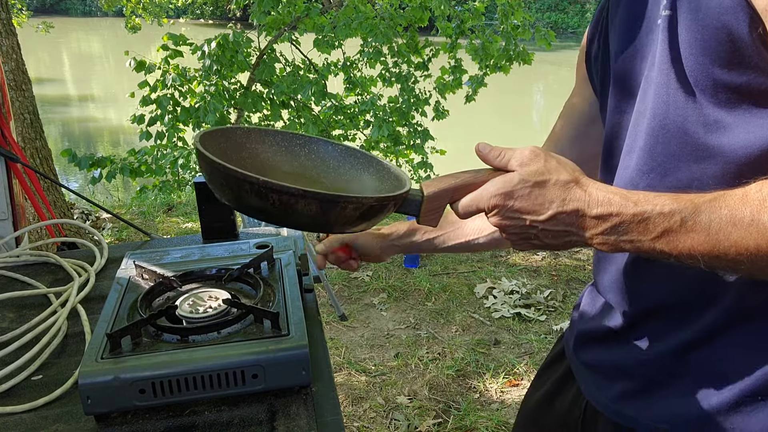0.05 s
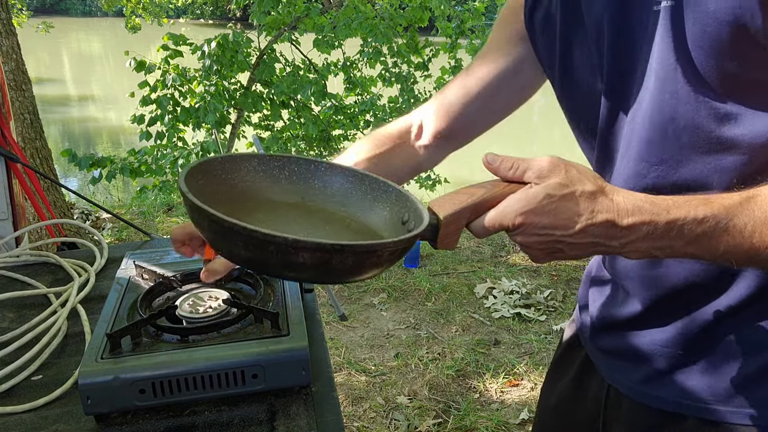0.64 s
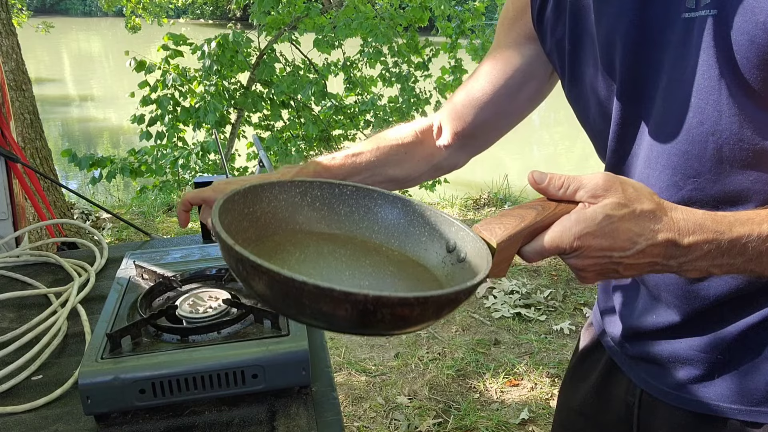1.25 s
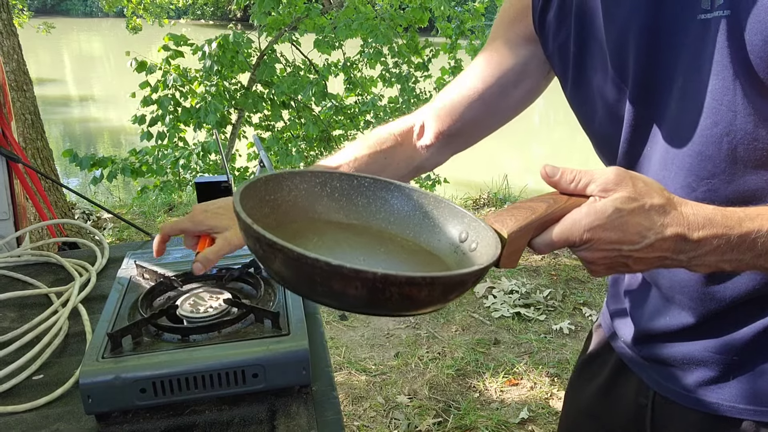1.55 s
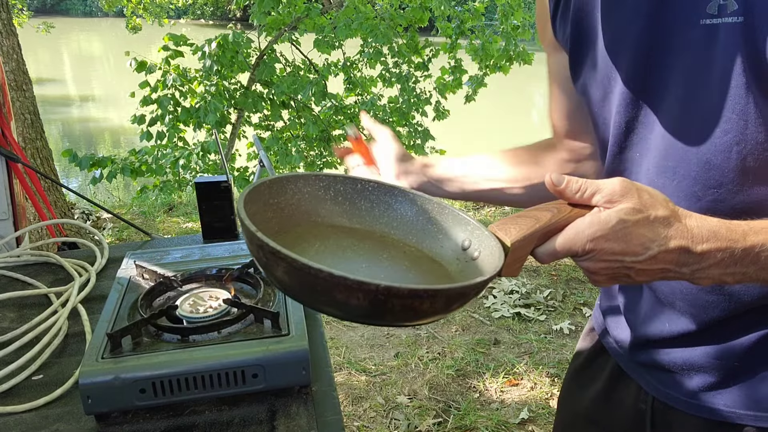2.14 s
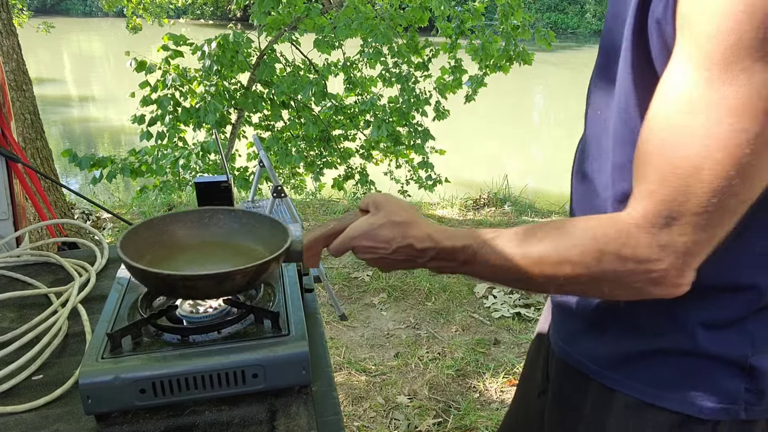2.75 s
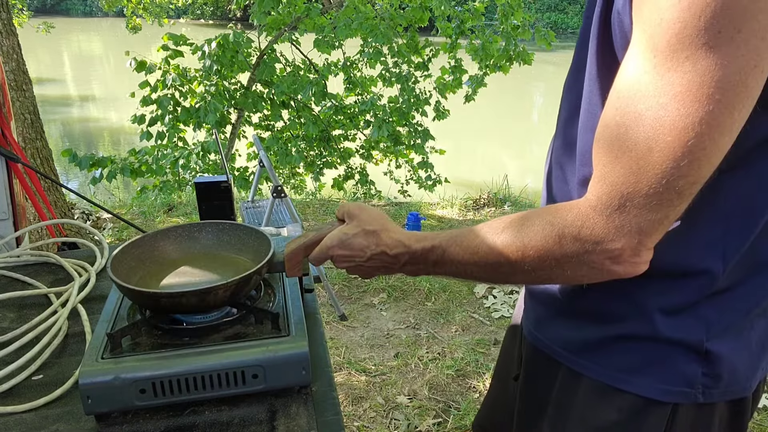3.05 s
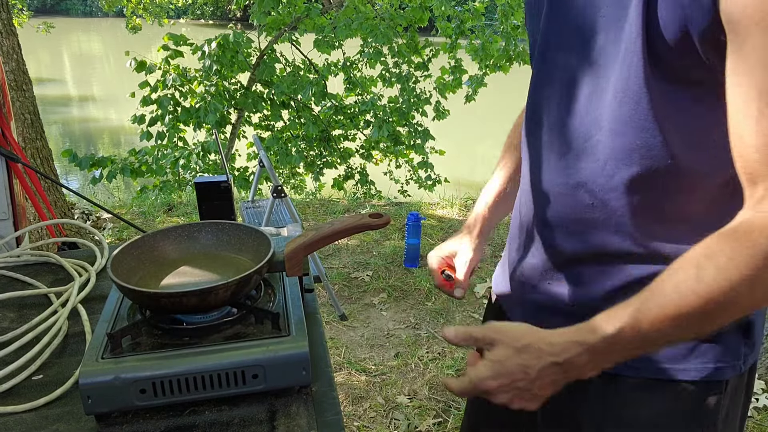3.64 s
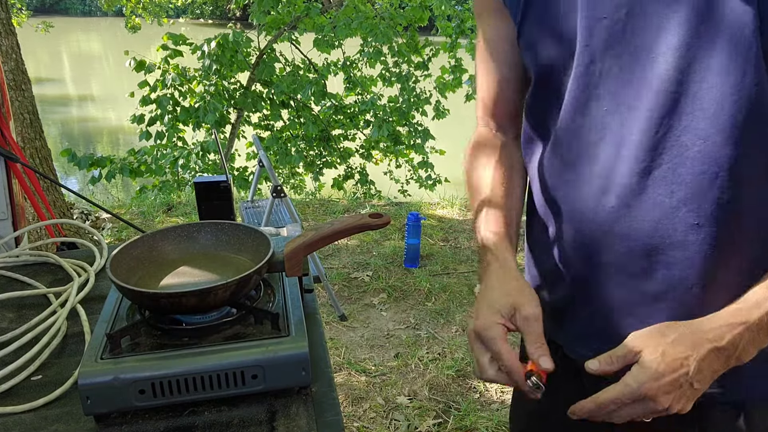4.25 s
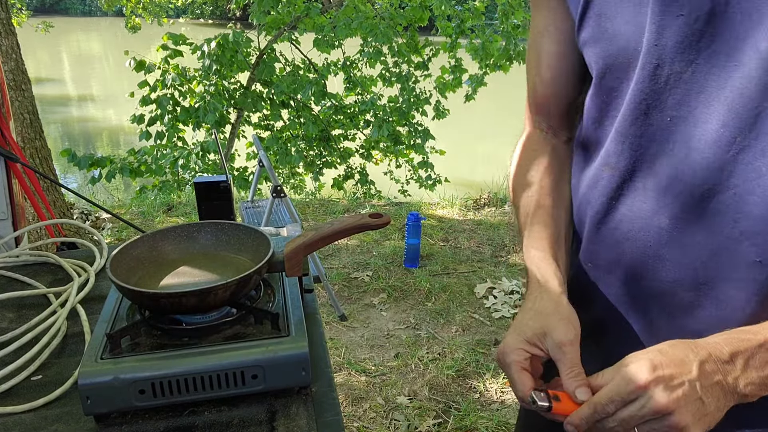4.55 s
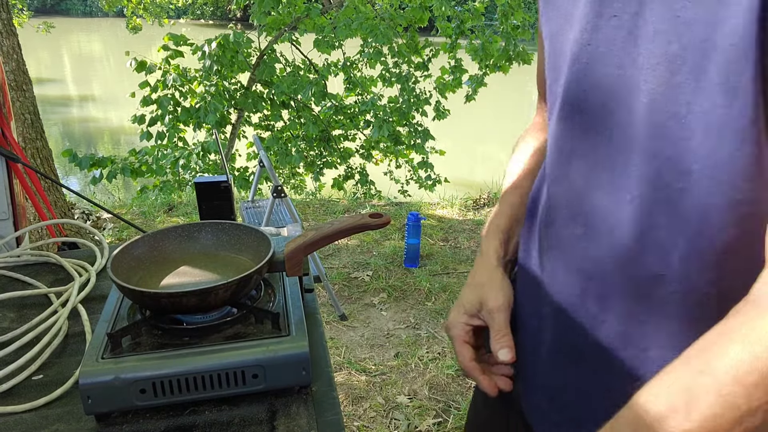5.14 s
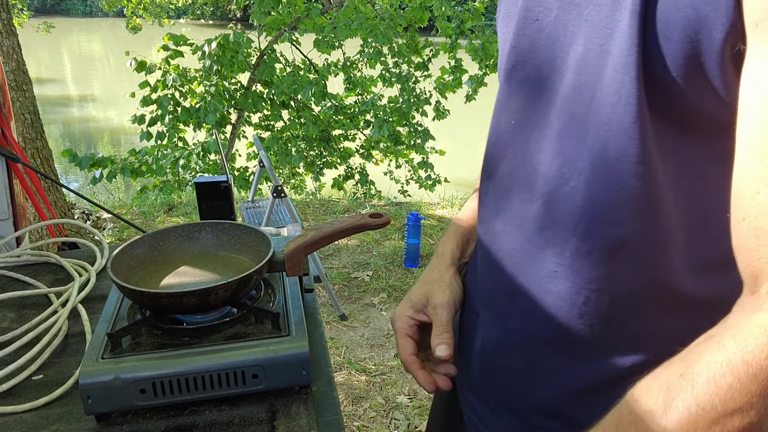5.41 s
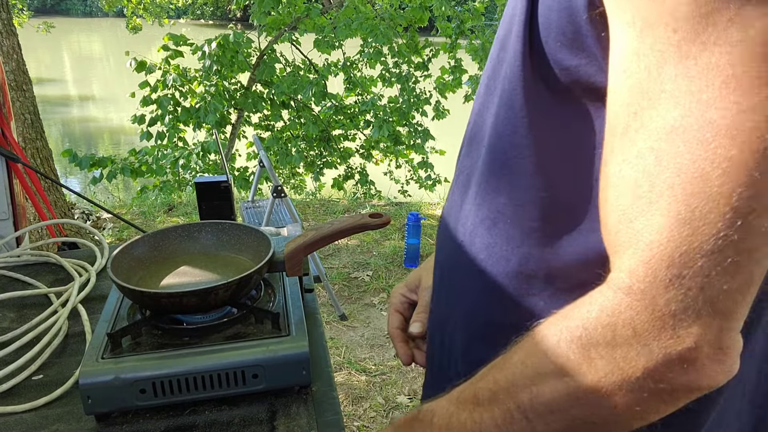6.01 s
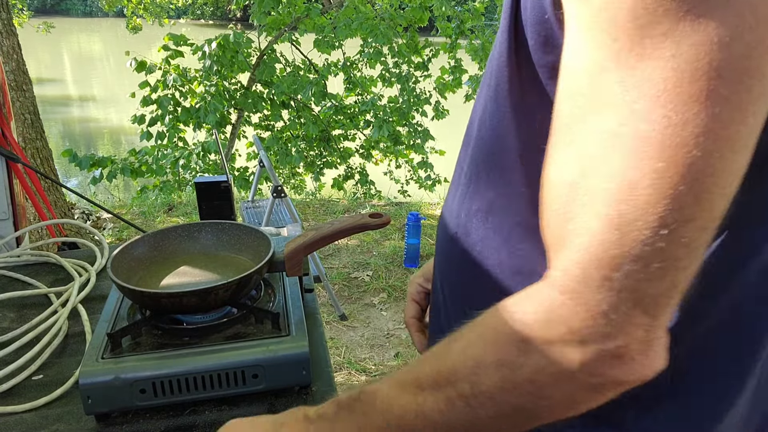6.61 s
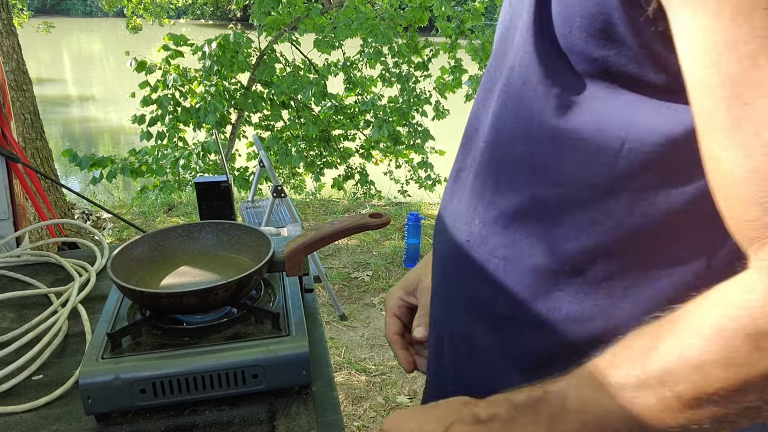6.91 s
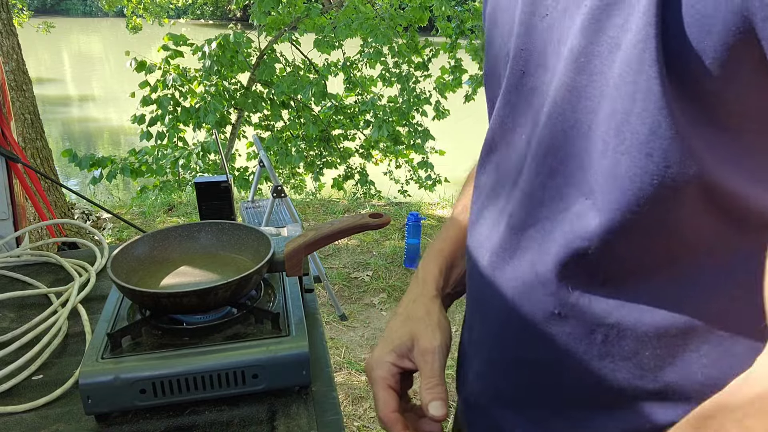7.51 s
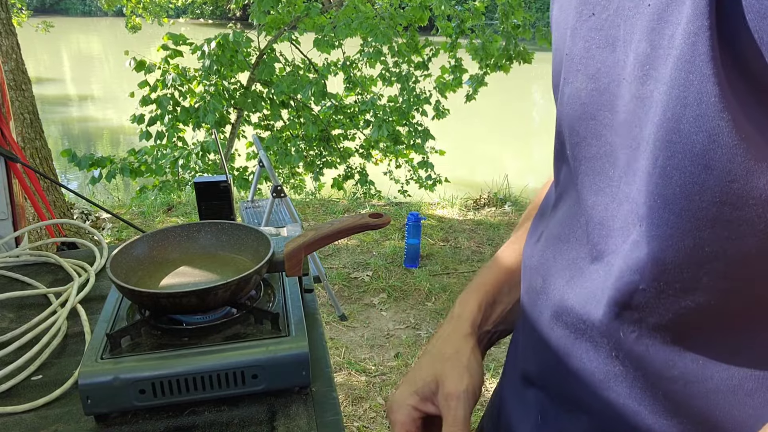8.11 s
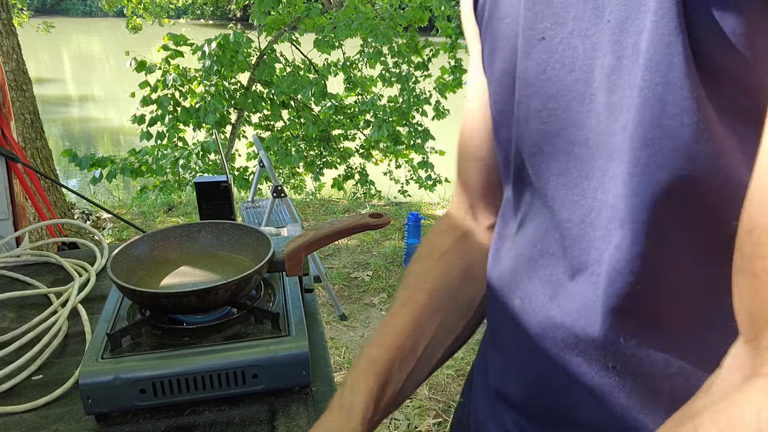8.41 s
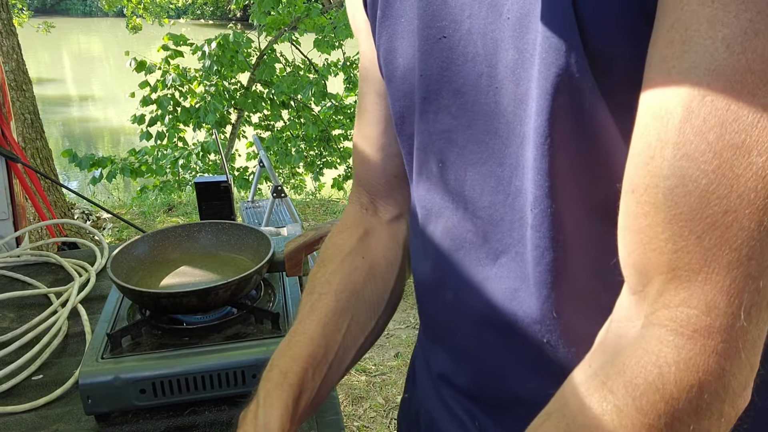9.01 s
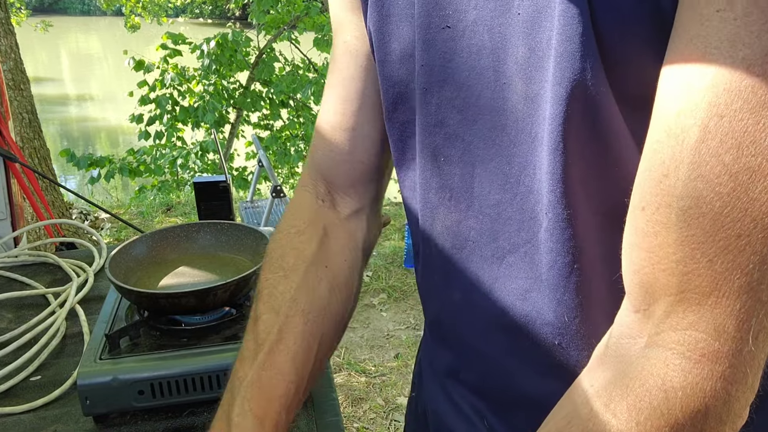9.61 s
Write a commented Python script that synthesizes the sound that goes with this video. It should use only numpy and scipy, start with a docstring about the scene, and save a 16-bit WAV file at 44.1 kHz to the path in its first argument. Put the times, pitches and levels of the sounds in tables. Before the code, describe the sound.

Close by, a portable gas stove flares with a thump that rings its steel case, and a flint lighter rasps twice. A frying pan clanks onto the grate. Light objects clack and slide on a table, a metal one knocks sharply, and a wrapper crinkles faintly. Behind it all, insects buzz in the trees over soft open air and a far low drone.

```python
"""Camp stove among insects

Close up, gas flares and rings the stove's steel case; a second later a flint lighter rasps twice. A
frying pan clanks onto the grate. Things clack, slide and knock on the table, then a wrapper crinkles as
its creases let go. Each hit is a burst of decaying noise, with ringing modes for case, pan and metal.
Behind, two insect choruses of band-shaped noise throb in the trees over open air and a far low drone."""
import sys
import numpy as np
from scipy import signal
from scipy.fft import rfft, irfft
from scipy.io import wavfile
from scipy.ndimage import uniform_filter1d

SR = 44100
rng = np.random.default_rng(int(sys.argv[2]) if len(sys.argv) > 2 else 0)


def to_wav(s):
    """Save 16-bit WAV."""
    ch = np.atleast_2d(s).T  # columns
    pcm = np.round(np.clip(ch, -1, 1) * 32767)  # PCM
    wavfile.write(sys.argv[1], SR, pcm.astype(np.int16))


N = 430416

# gas flares and lighter strokes: t/s, level/dB, swell/s, decay multiplier, low-pass f/Hz
GAS_FLARES = [(.7995, -35, 0.0019, 1.6, 15000), (.833, -31, 0.0059, 0.38, 15000),
              (.846, -24.5, 0.0058, 0.92, 15200)]
FLINT_STROKES = [(1.774, -42, 0.0021, 1.1, 12200), (1.837, -42, 0.0013, 0.56, 15000)]
# their tone: f/Hz, level/dB
FLARE_EQ = [(100, 4.5), (280, 5), (500, -2), (1100, 2), (2000, 0.5), (3500, 6), (4500, 6.5), (6500, 3),
            (7200, 4.5), (7900, 3.5), (8900, -10), (13500, -0.5), (16000, -9)]
FLINT_EQ = [(200, 6.5), (700, -15), (2000, -3.5), (4000, 2.5), (7500, 3), (9000, -7), (13000, -1),
            (16000, -6)]
# ring of the steel case: f/Hz, level/dB, t60/s
STOVE_MODES = [(284, -2.5, 0.18), (685, 3.5, 0.12), (1160, 10, 0.034), (1504, -3.5, 0.15), (2490, 0, 0.1),
               (3330, 1, 0.09), (3840, -9.5, 0.19), (5550, -4, 0.12), (7690, 5.5, 0.095)]


def stove():
    """Gas flares up and rings the stove's case; a second later a flint lighter rasps twice."""
    flint = hits(FLINT_STROKES, FLINT_EQ, grit=0.76)
    flare = hits(GAS_FLARES, FLARE_EQ, STOVE_MODES, ring_db=-11.5, grit=0.39)
    return flare + flint


# pan meets grate: t/s, level/dB, swell/s, decay multiplier, low-pass f/Hz
PAN_CLANKS = [(2.952, -49, 0.0049, .8, 3000), (2.9675, -31.5, 0.00094, 0.97, 2520),
              (3.1385, -28, 0.0011, 0.41, 3700), (3.144, -30.5, 0.00051, 0.85, 3780),
              (3.229, -36.5, 0.00033, 0.71, 2450)]
# tone of the pan: f/Hz, level/dB
PAN_EQ = [(100, -4), (300, 1), (600, -5.5), (900, -3.5), (1300, -7), (1900, -1), (2600, -2), (3300, 1),
          (4200, 5.5), (8000, 15), (16000, -30)]
# ring of the pan: f/Hz, level/dB, t60/s
PAN_RING = [(657, -3, .16), (850, -4, .16), (1028, -5, .16), (1380, -6, .19), (1577, -5, .08),
            (1879, -1, .09), (2116, -5, .11), (2336, -5, .08), (3316, 3, .06)]


def pan():
    """The frying pan lands on the grate and rings at each contact."""
    return hits(PAN_CLANKS, PAN_EQ, PAN_RING, ring_db=-8, tick=4, grit=0.4)


# light things, a metal thing, a small ping: t/s, level/dB, swell/s, decay multiplier, low-pass f/Hz
LIGHT_CLACKS = [(5.3508, -26.5, 0.00049, 0.57, 12000), (5.3595, -31.5, .0002, 0.66, 11000),
                (5.3638, -38, 0.00024, 0.5, 11000), (5.3898, -38, 0.00014, 0.6, 8000),
                (5.765, -50, 0.014, 0.41, 1900), (8.225, -57.5, 0.0079, 0.85, 910)]
METAL_KNOCKS = [(6.4855, -33, 0.0014, 1, 1510), (6.5045, -23.5, 0.0012, 0.44, 12000),
                (6.5066, -20, 0.00017, 0.88, 13000), (6.5255, -38, 0.00089, 0.62, 15000),
                (6.618, -56, 0.0022, 0.92, 1600)]
SMALL_PING = [(8.972, -53.5, 0.0012, 0.33, 2200)]
# their tone: f/Hz, level/dB
CLACK_EQ = [(90, -18), (200, -2), (330, 6.5), (480, 2), (750, 5.5), (1100, 2), (1600, 3), (3000, 0.5),
            (5000, 5.5), (7000, -7.5), (7900, 4), (9000, -18), (12500, -13.5), (16000, -5)]
METAL_EQ = [(80, -6), (130, 0), (330, 4), (430, -1.5), (800, 2), (1150, 4.5), (1500, 2.5), (2200, 6),
            (3000, 2.5), (5000, 4.5), (6300, 5.5), (7900, 6), (9000, -6.5), (12500, -10), (16000, -12)]
PING_EQ = [(500, -27), (1300, -13), (1550, 1), (1800, -23), (4000, -20)]
# ring of the metal thing: f/Hz, level/dB, t60/s
METAL_RING = [(253, -5, .17), (360, -5, .12), (490, -5, .14), (835, -5, .11), (1086, -1, .14),
              (1227, -7, .11), (2134, 2.5, .13), (2422, -7, .12), (3565, -1, .1), (4753, -7, .09),
              (5394, -3, .12), (6165, -4, .07), (7650, -3, .08)]


def table_clatter():
    """Things land on the table: light ones clack, a metal one rings, and a small ping follows."""
    clacks = hits(LIGHT_CLACKS, CLACK_EQ, tick=5.8, grit=0.76)
    metal = hits(METAL_KNOCKS, METAL_EQ, METAL_RING, ring_db=-7.5, tick=3, grit=0.55)
    return clacks + metal + hits(SMALL_PING, PING_EQ)


# weight under the hits: t/s, level/dB, swell/s, decay multiplier, low-pass f/Hz
LOW_THUDS = [(.850, -39, 0.006, 0.61, 495), (.858, -40, 0.0027, 0.79, 128),
             (1.779, -39.5, 0.0014, 0.74, 790), (2.985, -46, 0.018, 0.94, 294),
             (3.153, -34, 0.0012, 0.6, 165), (3.250, -42, 0.015, 0.81, 340),
             (5.352, -45, 0.0067, 0.82, 555), (6.505, -30.5, .003, 0.72, 286)]
# their dull tone: f/Hz, level/dB
THUD_EQ = [(25, -16), (55, -1), (80, 4), (125, -1.5), (190, -5.5), (270, 3.5), (450, -7.5), (1000, -12.5),
           (4000, -32)]


def thuds():
    """The flame thumps, and stove and table answer a contact with a thud."""
    return hits(LOW_THUDS, THUD_EQ)


# short slides over the table: t/s, hold/s, level/dB
TABLE_SLIDES = [(5.98, 0.037, -44), (6.05, 0.024, -48), (6.108, 0.039, -43.5)]
# tone of the rubbed table top: f/Hz, level/dB
DRAG_EQ = [(60, -16), (130, 8), (200, -1), (300, -5), (460, -5), (600, -20), (820, -17), (1100, -43),
           (2500, -51), (9000, -65)]


def drag():
    """Uneven slips shake the table top into a dull rub."""
    slips = rng.standard_normal((2, N)) * amp(1.8 * waver(width_hz=63))
    rub = unit(equalise(stereo(slips, NEAR_IMAGE), DRAG_EQ))
    return rub * gestures(TABLE_SLIDES, attack_s=0.014, release_s=0.034)


# the hand squeezes: t/s, hold/s, level/dB
WRAPPER_SQUEEZES = [(7.58, .06, -65), (8.02, .05, -64), (8.38, 0.31, -62), (9.2, .09, -56),
                    (9.66, .06, -61)]
# standout snaps: t/s, level/dB, swell/s, decay multiplier, low-pass f/Hz
WRAPPER_SNAPS = [(7.620, -59, 0.0031, 0.56, 3600), (7.742, -58, 0.0018, 0.57, 4500),
                 (7.770, -54, 0.00046, .5, 16000), (8.036, -61, 0.0037, .9, 4000),
                 (8.082, -62, .001, .8, 16000), (8.390, -58, .001, 0.75, 16000),
                 (8.546, -58, 0.00092, 0.66, 14000), (9.125, -65, .001, .5, 16000),
                 (9.2395, -43.5, 0.00062, 0.53, 15000), (9.705, -54, 0.012, 0.68, 4000)]
# tone of the wrapper: f/Hz, level/dB
WRAPPER_EQ = [(500, -11), (2300, -3.5), (3200, 4), (4000, 0), (7500, 2), (9000, -10.5), (12500, -8.5),
              (16000, -12)]


def wrapper():
    """Creases let go in clumps under each squeeze and singly in the holding hand; a few snap loudly."""
    held_from_s, held_db = 7.6, -71.5
    clumps_db = 2 * waver(width_hz=18)
    pressure = gestures(WRAPPER_SQUEEZES, attack_s=0.018, release_s=0.06)
    squeezed = crinkle(per_s=200) * pressure * amp(clumps_db)
    held = crinkle(per_s=12) * amp(held_db) * (np.arange(N) / SR > held_from_s)
    return squeezed + held + hits(WRAPPER_SNAPS, WRAPPER_EQ, grit=0.33)


def crinkle(per_s):
    """Tiny creases let go at random, each with a short scatter."""
    creases = (rng.random(N) < per_s / SR) * amp(4 * np.minimum(rng.exponential(1, N), 3.5))
    t = np.arange(2048) / SR
    scatter = stereo(rng.standard_normal((2, len(t))) * np.exp(-t / 0.008), NEAR_IMAGE)
    crackle = signal.oaconvolve(creases[None], scatter, axes=1)[:, :N]
    return unit(equalise(crackle, WRAPPER_EQ))


# how close hits die away: f/Hz, t60/s
HIT_DECAY = [(70, 0.79), (140, 0.5), (300, 0.18), (600, 0.26), (1200, 0.2), (2500, 0.15), (6000, 0.11),
             (12000, 0.12)]


def hits(cues, eq, modes=(), ring_db=0, tick=0, grit=0):
    """Each hit: a contact tick, dense modes dying by band, a few clear ones. Soft ones swell, dull."""
    out, t = np.zeros((2, N)), np.arange(SR // 2) / SR
    onset = t < 0.025  # the level is set on this stretch
    for start_s, db, swell_s, decay_scale, top_hz in cues:
        noise = rng.standard_normal((2, len(t))) * unit(np.exp(grit * rng.standard_normal(len(t))))
        hz, age, bands = signal.stft(stereo(noise, NEAR_IMAGE), SR, nperseg=256)
        band_t60 = decay_scale * at_hz(HIT_DECAY, hz)[:, None]
        sound = signal.istft(bands * amp(-60 * age / band_t60), SR)[1][:, :len(t)]
        for mode_hz, mode_db, t60 in modes:
            phase = 2 * np.pi * rng.random() + rng.normal(0, 0.24, (2, 1))
            envelope = amp(ring_db + mode_db - 60 * t / (t60 * decay_scale))
            sound += envelope * np.sin(2 * np.pi * mode_hz * t + phase)
        sound *= 1 - np.exp(-(t / swell_s) ** 2)
        sound[:, 0] += tick * np.exp(-swell_s / 0.002)
        sound = equalise(sound, eq, top_hz)
        add(out, start_s, amp(db) * sound / sound[:, onset].std())
    return out


def tree_echo(x, wet_db, t60):
    """Trunks and leaves scatter a faint, dull tail back."""
    t = np.arange(SR) / SR
    envelope = amp(-60 * t / t60) * (1 - np.exp(-t / 0.033))
    tail = stereo(rng.standard_normal((2, SR)), FAR_IMAGE) * envelope
    tail = equalise(tail / np.linalg.norm(tail[0]), [(300, 6.0), (2000, -3), (9000, -22)])
    return amp(wet_db) * signal.oaconvolve(x, tail, axes=1)[:, :N]


# the insects swell and ebb: t/s, low chorus level/dB, high chorus level/dB
CHORUS_FADERS = [(0.0, -57, -53.5), (0.98, -55, -48), (2.69, -54, -48), (3.18, -53, -47),
                 (3.88, -56, -47.5), (5.9, -60, -56), (6.55, -58.5, -56), (8.73, -61, -56.5),
                 (9.76, -56.5, -52.5)]
# tone of each song: f/Hz, level/dB
LOW_SONG_EQ = [(2200, -22.5), (2650, -15.5), (3100, -4.5), (3600, -2), (3850, -1.5), (4100, -1),
               (4450, -10), (5200, -16), (7000, -64)]
HIGH_SONG_EQ = [(3600, -42), (4400, -7.5), (5000, -3.5), (5600, 1), (6100, -2.5), (6480, -2), (6850, -10.5),
                (7450, -7), (8000, -20.5), (8600, -41.5), (11500, -33.5), (13000, -36.5), (14000, -43.5)]


def insects():
    """A low and a high chorus, each throbbing at its own nearly steady rate."""
    low_db, high_db = curves(CHORUS_FADERS)
    low = chorus(low_db, LOW_SONG_EQ, throb_hz=10.15, depth_db=1.7, buzz_hz=238, rasp=0.07)
    high = chorus(high_db, HIGH_SONG_EQ, throb_hz=10.7, depth_db=1.1, buzz_hz=430, rasp=0.16)
    return low + high


def chorus(fader_db, song_eq, throb_hz, depth_db, buzz_hz, rasp, trim_db=4):
    """Many insects throb together, most deeply when loudest; their clicking tymbals roughen the song."""
    rate_hz = throb_hz * (1 + 0.035 * waver(width_hz=1))
    swing_db = depth_db * np.sqrt(amp(fader_db - fader_db.max()))
    throb_db = swing_db * np.cos(2 * np.pi * np.cumsum(rate_hz) / SR)
    wander = unit(uniform_filter1d(rng.standard_normal(N), size=2000))
    click_hz = buzz_hz * (1 + 0.066 * wander)
    tymbals = 1 + rasp * np.cos(2 * np.pi * np.cumsum(click_hz) / SR)
    song = far_wash(song_eq, streak_db=4, streak_frames=16)
    return song * tymbals * amp(trim_db + fader_db + throb_db)


# the drone rises and falls: t/s, level/dB
DRONE_FADER = [(0.0, -52), (1.09, -50), (2.01, -51), (2.31, -59.5), (3.48, -45), (3.83, -52), (6.79, -54),
               (6.96, -59.5), (7.99, -57.5), (8.29, -60), (8.7, -50), (8.97, -49.5), (9.27, -52),
               (9.54, -63), (9.76, -57)]


def drone(pitch_hz=64.5, trim_db=5.5):
    """A far low tone wavers in pitch and level."""
    cycles = np.array([np.cumsum(pitch_hz * (1 + 0.06 * waver(width_hz=7))) / SR for _ in range(2)])
    level_db = trim_db + curves(DRONE_FADER)[0] + 2 * waver(width_hz=6)
    return stereo(np.sin(2 * np.pi * cycles), FAR_IMAGE) * amp(level_db)


# tone of the outdoor bed: f/Hz, level/dB
AIR_EQ = [(15, -9.5), (30, -3), (48, 0.5), (80, -2), (120, 2), (160, -11.5), (230, -23.5), (370, -18.5),
          (520, -24), (1400, -25.5), (2300, -32), (7500, -23.5), (9000, -47.5), (16000, -55)]


def open_air():
    """A faint, bass-heavy wash of open air."""
    return far_wash(AIR_EQ, streak_db=2, streak_frames=14) * amp(-49.5)


def far_wash(eq, streak_db, streak_frames, right_lag_s=0.00041):
    """Distant noise whose narrow streaks come and go; it reaches the right side a little later."""
    noise = stereo(rng.standard_normal((2, N)), FAR_IMAGE)
    hz, _, bands = signal.stft(noise, SR, nperseg=2048, noverlap=1536)
    bands[1] *= np.exp(-2j * np.pi * hz * right_lag_s)[:, None]
    streaks = uniform_filter1d(rng.standard_normal(bands.shape[1:]), size=streak_frames, axis=1)
    streaks = unit(uniform_filter1d(streaks, size=3, axis=0))
    bands *= amp(at_hz(eq, hz)[:, None] + streak_db * streaks)
    return unit(signal.istft(bands, nperseg=2048, noverlap=1536)[1][:, :N])


# stereo image of far and near sounds: f/Hz, left-right correlation, left minus right level/dB
FAR_IMAGE = [(60, 1, 0.5), (111, 1, -2), (200, 1, 4.5), (380, 0.97, -0.5), (696, 0.63, 7),
             (1230, 0.29, 2.5), (2350, 0.18, 3.5), (8000, 0.1, 5.5)]
NEAR_IMAGE = [(60, 0.95, -1.5), (250, 1, 1), (540, 0.85, -1.5), (990, 0, 1.5), (2250, 0.11, 2),
              (4100, 0.45, 3.5), (8000, 0.38, 5.5), (12000, 0.2, 4.5)]


def stereo(x, image):
    """Blends two unrelated signals into what a spaced pair of microphones hears."""
    a, b = rfft(x)
    hz = np.fft.rfftfreq(x.shape[1], 1 / SR)
    points_hz, correlation, lean_db = np.transpose(image)
    alike = np.clip(at_hz(np.c_[points_hz, correlation], hz), -1, 1)
    lean = amp(at_hz(np.c_[points_hz, lean_db], hz) / 2)
    mid, side = a * np.sqrt((1 + alike) / 2), b * np.sqrt((1 - alike) / 2)
    return irfft([(mid + side) * lean, (mid - side) / lean], x.shape[1])


def equalise(x, eq, top_hz=SR, size=4096):
    """Minimum-phase EQ, rolled off above top_hz."""
    hz = abs(np.fft.fftfreq(size, 1 / SR))
    gain = amp(at_hz(eq, hz)) / np.sqrt(1 + (hz / top_hz) ** 12)
    log_response = np.conj(signal.hilbert(np.log(gain + 1e-5)))
    taps = np.fft.ifft(np.exp(log_response)).real
    return signal.oaconvolve(x, taps[None], axes=1)[:, :x.shape[1]]


def gestures(cues, attack_s, release_s):
    """Envelope of a series of movements: each rises, holds and dies away."""
    t = np.arange(N) / SR
    envelope = np.zeros(N)
    for start_s, hold_s, db in cues:
        attack = np.clip((t - start_s) / attack_s, 0, 1)
        release = np.exp(-np.maximum(t - start_s - hold_s, 0) / release_s)
        envelope += amp(db) * attack * release
    return envelope


def waver(width_hz):
    """A slow random wobble of rms 1."""
    hz = np.fft.rfftfreq(N, 1 / SR)
    return unit(irfft(rfft(rng.standard_normal(N)) * np.exp(-(hz / width_hz) ** 2), N))


def curves(faders):
    """Each fader's value at every sample."""
    times, *columns = np.transpose(faders)
    return [np.interp(np.arange(N) / SR, times, column) for column in columns]


def at_hz(points, hz):
    """Reads a curve on a log-frequency axis."""
    f, value = np.transpose(points)
    return np.interp(np.log(hz + 1), np.log(f + 1), value)


def add(mix, start_s, sound):
    """Mixes a stereo sound in at start_s."""
    part = mix[:, max(round(start_s * SR), 0):][:, :sound.shape[1]]
    part += sound[:, :part.shape[1]]


def amp(db):
    """Decibels to gain."""
    return 10 ** (np.asarray(db) / 20)


def unit(x):
    """Scales to rms 1."""
    return x / np.sqrt(np.mean(x ** 2) + 1e-20)


def scene():
    """Close handling sounds and their echo in front of insects, drone and open air."""
    near = stove() + pan() + table_clatter() + thuds() + drag() + wrapper()
    chorus_bed = insects()
    return near + tree_echo(near, wet_db=-24, t60=0.38) + chorus_bed + drone() + open_air()


def record(dry, cutoff_hz=15850):
    """A steep low-pass on the whole mix."""
    low_pass = signal.firwin(511, cutoff_hz, window=("kaiser", 9), fs=SR)
    return signal.oaconvolve(dry, low_pass[None], "same")


dry = scene()
out = record(dry)
to_wav(out)
```